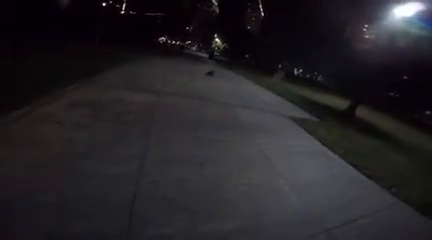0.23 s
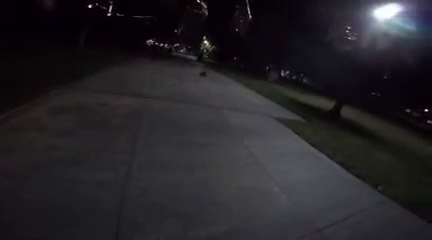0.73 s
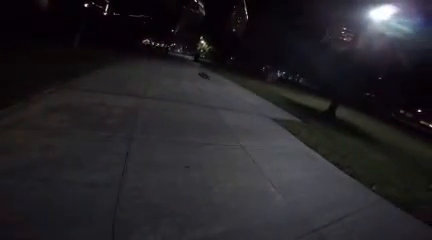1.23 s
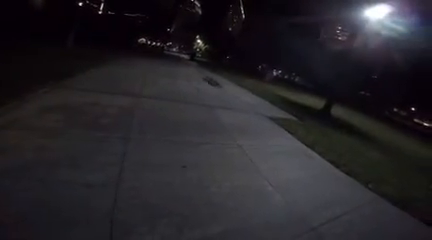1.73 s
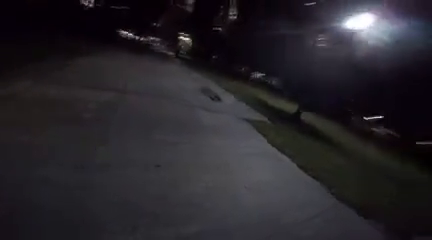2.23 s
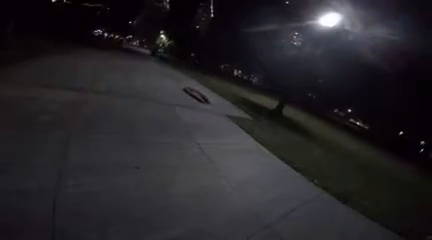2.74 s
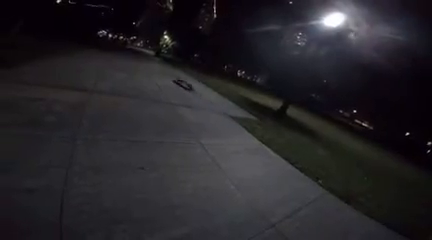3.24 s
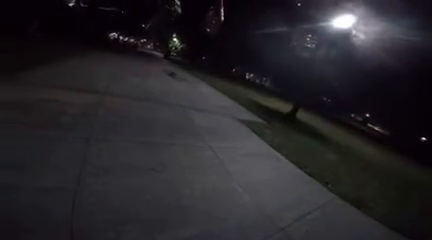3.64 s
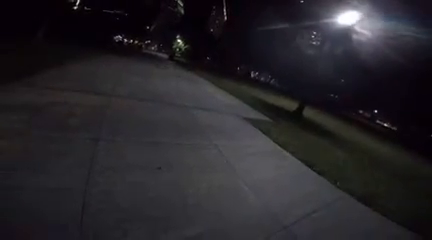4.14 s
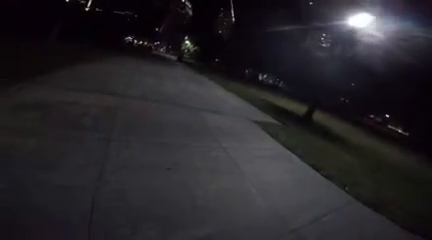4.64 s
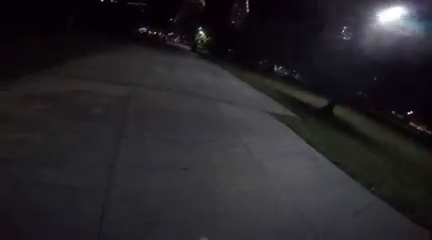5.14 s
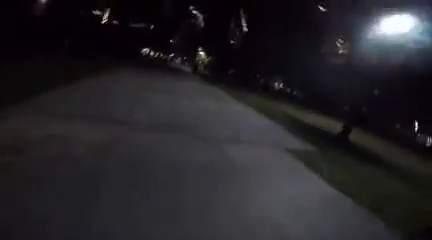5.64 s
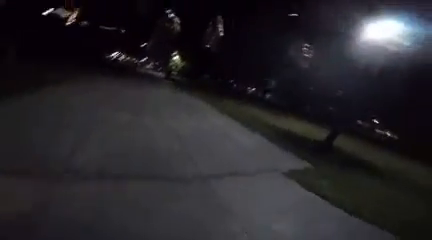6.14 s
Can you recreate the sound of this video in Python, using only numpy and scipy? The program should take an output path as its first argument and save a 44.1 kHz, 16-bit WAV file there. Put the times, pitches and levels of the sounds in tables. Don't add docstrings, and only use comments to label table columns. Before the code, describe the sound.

Brief high squeaks start a motorised board rolling outdoors. A steady buzzy whine joins gritty wheel noise, then hard knocks, ringing trucks, dull thuds and chattering loose parts crowd together around two and a half to three and a half seconds. The motor winds down, leaving wind puffs, isolated ticks and a faint distant coasting whine. Soft rolling and small rings build again at the end, over microphone hiss and a weak far engine drone.

```python
import sys
import numpy as np
from scipy import signal
from scipy.fft import rfft, irfft, next_fast_len
from scipy.io import wavfile

SR = 44100
rng = np.random.default_rng(int(sys.argv[2]) if len(sys.argv) > 2 else 0)


def bounce(signal):
    frames = np.transpose(np.atleast_2d(signal))
    limited = np.clip(frames, -1, 1)
    pcm = np.round(limited * 32767).astype(np.int16)
    wavfile.write(sys.argv[1], SR, pcm)


def decibels_to_gain(level_db):
    exponent = np.asarray(level_db, float) / 20
    return 10 ** exponent


N = 281797

# time in seconds, level in dB
DRONE = [
    (.04, -74),
    (.24, -58),
    (.62, -68.5),
    (.85, -75),
    (1.22, -65.5),
    (2.2, -62.5),
]
# time in seconds, level in dB
WHIRR = [
    (.3, -70),
    (1.3, -76),
    (3.3, -74),
]
# frequency in Hz, density in dB per Hz
HISS = [(200, 1), (300, -1), (800, -6), (1400, -7.5), (2600, -6.5), (2880, -3.5), (3500, -10),
        (4500, -10.5), (6000, -11), (7000, -13.5), (9000, -14.5), (11500, -18.5), (13000, -16.5),
        (16500, -16)]
# frequency in Hz, level in dB, delay in seconds, length in seconds
BURSTS = [
    (12490, -71, 0, .0028),
    (8555, -72, .0062, .004),
]
# time in seconds, gust level in dB
AIR = [(0, -72), (.6, -56), (2.0, -53.5), (2.4, -46), (2.6, -55.5), (3.5, -56), (4.1, -60), (4.9, -53),
       (5.7, -47), (6.1, -55), (6.39, -64)]
# time in seconds, level in dB
GUSTS = [(.03, -45.5), (.16, -48), (.28, -54), (.53, -48), (2.13, -60), (2.3, -44), (2.44, -48),
         (2.99, -52.5), (3.2, -56), (3.67, -50.5), (3.9, -49), (4.03, -51.5), (4.17, -49.5), (4.34, -51.5),
         (4.59, -55), (4.75, -57), (5.26, -74), (5.5, -56), (5.78, -48), (5.9, -45), (6.03, -47),
         (6.31, -42.5)]
# time in seconds, level in dB
EDDIES = [(0.0, -62.5), (0.21, -60.5), (0.64, -61.5), (2.03, -60.5), (2.21, -59.5), (2.65, -62.5),
          (3.75, -62.5), (3.9, -68.5), (4.04, -56.5), (4.09, -73.5), (4.18, -55.5), (4.22, -74),
          (4.36, -63.5), (4.43, -66), (5.91, -63), (6.26, -66), (6.32, -58.5), (6.39, -68)]
# frequency in Hz, density in dB per Hz
BUFFET = [(7.1, -12), (12, 6), (32, 2.5), (90, -20.5), (120, -63), (200, -120)]
# frequency in Hz, density in dB per Hz
FLUTTER = [(29, -34), (50, -6.5), (119, -14), (151, -16.5), (210, -22.5), (385, -33), (450, -55),
           (580, -83), (990, -120)]
# time in seconds, peak level in dB
PUFFS = [(2.199, -47), (2.29, -44), (2.33, -54), (3.714, -41), (3.965, -48), (4.011, -47), (4.037, -45.5),
         (4.133, -49), (4.168, -46.5), (5.1, -50), (5.284, -49)]
# start in seconds, peak level in dB, frequency in Hz
TICKS = [
    (4.3294, -58, 6000),
    (4.3794, -60, 5800),
    (4.7516, -62, 12100),
    (4.7765, -60, 11600),
    (5.139, -62, 4540),
    (6.095, -55, 4420),
]
# start in seconds, peak level in dB, frequency in Hz
THUDS = [
    (1.55, -45.5, 176),
    (1.585, -54, 122),
    (2.086, -59, 124),
    (2.278, -52.5, 317),
    (2.382, -65, 161),
    (2.969, -59.5, 128),
    (3.144, -50.5, 161),
    (3.331, -59, 121),
    (3.568, -54, 158.4),
]
# time in seconds, level in dB
BEARING = [
    (.25, -73),
    (4.63, -82),
    (5.8, -78),
    (5.96, -74),
    (6.22, -84),
    (6.37, -72),
]
# frequency in Hz, width in Hz, level in dB
BEARING_NOTE = [(2890, 280, -2), (2980, 266, -1.5)]
# start in seconds, peak level in dB, frequency in Hz
SQUEAKS = [(.0618, -54, 2740), (0.12, -41, 2840), (0.145, -47, 2890), (0.169, -38, 2830),
           (.2503, -51, 2780), (.2668, -49, 2830), (.3194, -53, 2790), (0.35, -47, 3000),
           (4.3964, -48.5, 2810), (4.4448, -44, 2855), (4.937, -52, 2670), (4.956, -51, 2720),
           (4.962, -51, 3300), (4.9744, -52, 2740), (5.6416, -48, 2840), (5.7767, -41.5, 2890)]
# time in seconds, whine in Hz, level in dB
COAST = [
    (4.44, 3010, -83),
    (4.54, 3500, -74),
    (4.7, 3560, -73),
    (4.86, 3640, -73),
    (4.93, 3500, -86),
]
# start in seconds, peak level in dB
CRACKS = [
    (2.208, -54),
    (2.261, -44),
    (2.3825, -58),
    (2.503, -52),
    (2.977, -47),
    (3.1457, -38.5),
    (3.207, -37.5),
    (3.3203, -46),
    (3.4755, -48.5),
    (3.5733, -49),
]
# start in seconds, peak level in dB, frequency in Hz
CHATTER = [(2.387, -59, 5200), (2.4073, -51, 5170), (2.4821, -58, 5410), (2.5016, -48, 5200),
           (2.5645, -54, 5350), (2.612, -46, 5240), (2.6587, -53, 5270), (2.7066, -56, 5170),
           (2.741, -52, 5250), (2.8154, -53.5, 5260), (2.8553, -56.5, 5370), (2.8992, -55.5, 5230),
           (2.9764, -40.5, 5370), (3.0523, -45, 5650), (3.068, -53, 5100), (3.1443, -37.5, 5570),
           (3.197, -53.5, 5450), (3.207, -54, 5300), (3.2454, -57, 5050), (3.2637, -51, 5670),
           (3.3038, -54, 5220), (3.3217, -51, 5040), (3.387, -55, 5400), (3.4021, -56, 4930),
           (3.4335, -48, 5100), (3.4725, -51, 5100), (3.5223, -53.5, 5120), (3.5727, -42, 5130),
           (3.5991, -54.5, 5400), (3.634, -54, 5270), (3.6854, -56, 5070), (3.7273, -47.5, 5260),
           (3.7667, -49, 5360), (3.8286, -55, 5150), (3.916, -57, 4850), (3.9628, -55.5, 4670)]
# start in seconds, peak level in dB, frequency in Hz
TRUCK_RINGS = [(1.4036, -58, 1850), (1.5100, -45, 1840), (1.5408, -45.5, 1670), (1.5707, -43, 1870),
               (1.6331, -43, 1880), (1.652, -49, 1700), (1.7496, -47, 1790), (1.781, -49.5, 1940),
               (1.8201, -45, 1930), (2.0094, -48, 1800), (2.079, -36, 1900), (2.1425, -43, 1950),
               (2.2045, -47, 1810), (2.2082, -38, 1650), (2.2845, -44, 1710), (2.3539, -47, 1930),
               (2.3848, -35, 1860), (2.4656, -50, 1910), (2.4851, -35.5, 1780), (2.5006, -35.5, 1840),
               (2.5305, -36, 1910), (2.561, -34, 1850), (2.5981, -35.5, 1764), (2.6393, -39, 1900),
               (2.6575, -41, 1890), (2.7424, -38.5, 1920), (2.8177, -38, 1730), (2.9017, -35, 1800),
               (2.9685, -32, 1780), (3.051, -35, 1760), (3.1127, -49.5, 1920), (3.1377, -47, 1720),
               (3.1459, -41, 1740), (3.189, -48, 1940), (3.2064, -37, 1754), (3.2652, -42, 1920),
               (3.3227, -43, 1740), (3.4195, -48.5, 1920), (3.4355, -46, 1820), (3.4765, -38, 1910),
               (3.5577, -48, 1850), (3.5772, -34, 1940), (3.634, -45, 1750), (3.7677, -51, 1780)]
# start in seconds, peak level in dB, frequency in Hz
HOUSING_RINGS = [(1.4041, -48, 3400), (1.5104, -45, 3500), (1.571, -49.5, 3170), (1.7802, -44.5, 2900),
                 (1.9768, -54, 3010), (2.0107, -46.5, 2980), (2.086, -41.5, 3000), (2.1444, -40, 2970),
                 (2.209, -41, 2860), (2.2735, -40.5, 2150), (2.2766, -34, 3900), (2.3864, -38.5, 3030),
                 (2.4848, -47, 3830), (2.4996, -33, 3100), (2.53, -43, 3330), (2.6057, -43, 3100),
                 (2.6423, -51, 3760), (2.6567, -42, 2980), (2.7036, -49, 3870), (2.7426, -36.5, 3000),
                 (2.8216, -35, 2980), (2.903, -52, 2770), (2.9775, -38, 3540), (2.9775, -42, 3360),
                 (3.0531, -44, 3110), (3.1387, -40, 3400), (3.1466, -46, 3300), (3.205, -45, 2700),
                 (3.3227, -39, 2890), (3.3897, -44.5, 3460), (3.4764, -41.5, 2930), (3.5723, -42, 3130),
                 (3.5782, -40, 2640), (3.5773, -34, 2930), (3.7692, -48, 3440)]
# start in seconds, peak level in dB, frequency in Hz
RETURN_RINGS = [(4.667, -51, 1970), (4.689, -41, 3300), (4.691, -50, 1990), (4.826, -54, 2850),
                (4.938, -46, 2720), (5.406, -48, 2900), (5.8095, -53, 1440), (5.8445, -49, 1940),
                (5.8935, -56, 1640), (5.907, -56, 1870), (5.9229, -58, 2130), (5.952, -50, 1720),
                (5.9773, -51, 1940), (5.9983, -52, 1930), (6.061, -57, 1880), (6.105, -48, 1850),
                (6.136, -49, 2070), (6.1672, -46, 1740), (6.1908, -50, 2040), (6.2307, -47, 1740),
                (6.2562, -53, 1920), (6.3, -60, 1810), (6.3579, -50, 1830)]
# start in seconds, peak level in dB, frequency in Hz
PINGS = [
    (5.139, -52, 5500),
    (6.096, -46, 5450),
]
# frequency in Hz, width in Hz, level in dB
DECK = [(543, 250, 9), (700, 207, 6.5), (970, 340, 1.5), (1323, 225, 0.5)]
# frequency in Hz, width in Hz, level in dB
TRUCKS = [(1700, 274, -3), (1988, 320, 2), (2123, 680, -9.5), (2470, 250, -11.5)]
# frequency in Hz, width in Hz, level in dB
HOUSING = [(2925, 620, 0.5), (3372, 280, -1.5), (3745, 680, -2.5)]
# frequency in Hz, width in Hz, level in dB
SMALL_PARTS = [(5170, 750, 5), (5860, 1450, -11.5), (7360, 740, 0), (8500, 180, -6), (9700, 2300, -14)]
# frequency in Hz, width in Hz, level in dB
EDGES = [(9800, 2500, 0.85), (13600, 4200, -0.78)]
# peak time in seconds, peak level in dB, place struck (0 trucks, 1 housing, 2 small parts),
# length in ms. First the board coming nearer
KNOCKS_NEARING = [(1.4058, -51, 0.53, 5), (1.4856, -55.5, 1.55, 5.7), (1.5127, -46.5, 0.26, 3.5),
                  (1.542, -48, .05, 4.7), (1.572, -44, 0.73, 3), (1.5926, -58, 0.44, 6),
                  (1.6346, -44.5, 0.25, 3.8), (1.6539, -53, .1, 2.8), (1.7812, -53, 0.59, 4.7),
                  (1.8222, -54.5, 0.58, 50), (1.905, -54, 0.57, 9.5), (1.979, -54, 1.14, 4.5),
                  (2.0127, -50, 0.63, 8.4), (2.0785, -43.5, .15, 4.1), (2.088, -46, 0.54, 7.2),
                  (2.146, -47.5, 0.49, 11), (2.2106, -44.5, 0.44, 11), (2.263, -32, 0.6, 2.4),
                  (2.279, -37, 0.7, 9), (2.293, -52.5, 0.5, 10), (2.3875, -36.5, 0.83, 2.9),
                  (2.409, -50.5, .7, 6.6)]
# peak time in seconds, peak level in dB, place struck, length in ms
KNOCKS_PASSING = [(2.4861, -42, 0.12, 3.3), (2.502, -37, 0.68, 2.2), (2.5308, -41, .4, 2.2),
                  (2.562, -41.5, 0.18, 2.9), (2.573, -54.5, 1.7, 4.7), (2.5996, -42.5, 0.48, 2.1),
                  (2.6078, -43, 1.3, 4.5), (2.659, -45, 0.46, 7.2), (2.6684, -51, .5, 20),
                  (2.705, -46.5, 1.1, 8), (2.743, -41, 0.65, 4.2), (2.822, -42.5, 0.46, 9.7),
                  (2.9031, -44, 0.42, 9.1), (2.97, -40.5, .02, 1.8), (2.979, -42, 1.2, 7.4),
                  (2.995, -52, 1.7, 8.1), (3.054, -41, 0.39, 8.3), (3.0703, -48.5, 1.43, 6.9),
                  (3.1403, -42.5, 0.53, 7.6), (3.1466, -42.5, 0.34, 8.9), (3.21, -42.5, 0.48, 5.8),
                  (3.266, -51.5, 0.6, 6.7), (3.3238, -43.5, 0.4, 4.4), (3.391, -52, 1.4, 11),
                  (3.437, -50.5, 0.58, 15), (3.479, -47, 0.92, 6.9), (3.573, -41.5, 0.62, 6),
                  (3.5782, -42, 0.28, 3), (3.6356, -45, 0.44, 2.8), (3.69, -53.5, 1.1, 12)]
# peak time in seconds, peak level in dB, place struck, length in ms
KNOCKS_FAR = [(3.7708, -52, 0.98, 10), (3.967, -54, 1.1, 12), (4.6694, -54, 0.62, 2.3),
              (4.6917, -58, 0.7, 5), (4.828, -57, .6, 8.7), (4.838, -55, 0.45, 3.4),
              (4.9396, -53, 0.69, 3.1), (5.141, -52.5, 1.4, 3.5), (5.2268, -58, 0.72, 12),
              (5.2858, -55, 0.86, 4.7), (5.343, -56, .15, 6.2), (5.3768, -57, .25, 2.9),
              (5.407, -49, 0.83, 2.2), (5.5334, -56.5, 0.63, 20), (5.8464, -55, .1, 4.6),
              (5.8534, -54, .3, 6.5), (5.871, -56, .65, 3.9), (5.9244, -55, 0.5, 3.5),
              (5.9542, -58, 0.45, 13), (5.9998, -53, .25, 6.8), (6.011, -58, 0.55, 3.7),
              (6.096, -55, 1.7, 2.4), (6.106, -58, .5, 5.5), (6.1377, -54, 0.2, 5), (6.17, -56, 0.22, 4),
              (6.2323, -54, .05, 6.2), (6.3593, -60, 0.59, 22)]
# time in seconds, wheels on grit in dB, drive spin in dB
ROLL = [(0, -8, -16), (.18, -6, -2), (.48, -11, 4), (1.1, -9.5, 5), (1.56, 1.5, 8.5), (2.05, 2, -1.5),
        (2.28, 1, 8.5), (2.61, 4.5, 4.5), (3.2, 0.5, 8.5), (4.06, -9, 2.5), (4.2, -10, -15),
        (4.47, -26, -5), (4.7, -6.5, -1), (5.12, -10.5, -11), (5.46, -5.5, -3), (5.66, -9, -9.5),
        (6.01, -1, 1.5), (6.39, 2.5, 1)]
# mean level in dB, share of the grit's dB, share of the spin's dB
ROLL_SHARES = [
    (-69.5, 1, 0.01),
    (-72.5, 0.45, 0.86),
    (-69.5, 0.0098, 0.84),
    (-71.5, 0.79, 0.44),
]
# time in seconds, small parts in dB
FACING = [
    (0, 4),
    (1.3, -0.5),
    (2.2, -1.5),
    (3.0, -0.5),
    (3.6, 1),
    (4.05, 3.5),
    (4.15, 1.5),
    (5.6, -1),
    (5.9, -4),
    (6.39, -2.5),
]
# time in seconds, whine in Hz, level in dB, brightness in dB (high when facing the microphone)
MOTOR = [(.2, 1250, -100, -6), (.3, 1560, -73, -2), (.39, 1930, -71, -2), (.47, 1950, -65, -3),
         (.7, 1945, -64, -2), (1.0, 1950, -66, -6), (1.35, 1960, -69, -3), (1.7, 1960, -70.5, 1),
         (2.22, 1960, -84, -16), (2.37, 2000, -64, -11), (2.6, 2020, -61, -15), (2.9, 2040, -61, -22),
         (3.3, 2000, -62.5, -24), (3.62, 1980, -63, -22), (3.83, 1950, -63.5, -27), (3.96, 1800, -68, -27),
         (4.16, 1600, -100, -20.5)]
ORDERS_OF_WHINE = (1, 2, 3, 7 / 4, 7 / 8, 3 / 2, 13 / 8, 15 / 8)
# dB over the level, share of the level's swing, share of the brightness,
# dB lost per 100 Hz below cruise
WHINE_LINES = [(0.5, 1.24, 0.11, 0), (4.5, 0.77, 0.18, -1.5), (0.5, 0.59, 0.56, 5), (-1.5, 0.55, 0.33, 1),
               (-14, 0.4, 0.7, -1.5), (-2.5, 0.4, 0.3, 2), (-9, .6, 0.3, 8), (-10.5, 0.42, 0.11, 5)]


def rms_one(x):
    return x / np.sqrt(np.mean(x ** 2) + 1e-20)


def in_time(rows):
    s, *columns = np.transpose(rows)
    return [np.interp(np.arange(N) / SR, s, c) for c in columns]


def swells(rows, rise_db_per_s, fall_db_per_s):
    t = np.arange(N) / SR
    return sum(decibels_to_gain(db - np.where(t < s, rise_db_per_s * (s - t), fall_db_per_s * (t - s))) for s, db in rows)


def drift(rate_hz):
    r = np.exp(-2 * np.pi * rate_hz / SR)
    noise = rng.standard_normal(N + SR)
    return rms_one(signal.lfilter([1], [1, -2 * r, r * r], noise)[SR:])


def resonate(x, peaks):
    out = 0
    for k, (hz, width, db) in enumerate(peaks):
        r = np.exp(-np.pi * width / SR)
        section = [(1 - r * r) / 2, 0, (r * r - 1) / 2, 1, -2 * r * np.cos(2 * np.pi * hz / SR), r * r]
        out = out + (-1) ** k * decibels_to_gain(db) * signal.sosfilt([section, section], x)
    return out


def coloured(spectrum):
    hz, db = np.transpose(spectrum)
    size = next_fast_len(N)
    bins = np.maximum(np.arange(size // 2 + 1) * SR / size, 1)
    shape = decibels_to_gain(np.interp(np.log(bins), np.log(hz), db, left=-60, right=-60))
    return rms_one(irfft(shape * rfft(rng.standard_normal(size)), size)[:N])


def background(hiss_db=-66.5, drone_hz=102.8, sag_hz_per_s=1.78):
    hz = drone_hz - sag_hz_per_s * np.arange(N) / SR
    drone = np.sqrt(2) * swells(DRONE, 58, 43) * np.sin(2 * np.pi * np.cumsum(hz) / SR)
    whirr = rms_one(resonate(rng.standard_normal(N), [(10920, 570, -0.32), (12860, 2100, -0.67)]))
    return drone + swells(WHIRR, 35, 19) * whirr + decibels_to_gain(hiss_db) * coloured(HISS)


def sensor(row_db=-71.3, half_db=-77.5, frame_hz=30 / 1.001, start_s=.0185, rows=421):
    frames = (np.arange(N) / SR - start_s) * frame_hz
    out = decibels_to_gain(row_db) * np.cos(2 * np.pi * rows * frames)
    out += decibels_to_gain(half_db) * np.sin(np.pi * rows * (frames % 1))
    for hz, db, delay, length in BURSTS:
        t = ((frames - delay * frame_hz + .5) % 1 - .5) / frame_hz
        out -= decibels_to_gain(db) * np.exp(-np.pi * (t / length) ** 2) * np.cos(2 * np.pi * hz * t)
    return out


def air(puff_s=0.0029, lump_db=2, flutter_db=-0.5, flutter_follows=0.036):
    gusts = swells(GUSTS, 185, 193)
    buffet_db = 20 * np.log10(decibels_to_gain(in_time(AIR)[0]) + gusts)
    eddy_db = flutter_db + flutter_follows * (buffet_db - buffet_db.mean()) + in_time(EDDIES)[0]
    out = decibels_to_gain(buffet_db) * coloured(BUFFET)
    out += decibels_to_gain(eddy_db + lump_db * drift(6.1)) * coloured(FLUTTER)
    t = np.arange(-round(0.0204 * SR), round(.02 * SR)) / SR / puff_s
    for s, peak_db in PUFFS:
        out[round((s - .016) * SR):][:len(t)] += decibels_to_gain(peak_db + 3.5) * t * np.exp(-t * t / 2)
    return out


def ticks(length_s=0.0026):
    t, out = np.arange(round(0.033 * SR)) / SR, np.zeros(N)
    for (s, peak_db, hz), shake in zip(TICKS, rng.standard_normal((len(TICKS), len(t)))):
        ring = resonate(shake * np.exp(-t / length_s), [(hz, 1800, 0)])
        out[round(s * SR):][:len(t)] += decibels_to_gain(peak_db) * ring / np.max(np.abs(ring))
    return out


def thuds(t60_s=0.088, rise_s=0.0027):
    t, out = np.arange(round(.1 * SR)) / SR, np.zeros(N)
    for s, peak_db, hz in THUDS:
        swell = decibels_to_gain(peak_db + 1.5 - 60 * t / t60_s) * (1 - np.exp(-t / rise_s))
        out[round(s * SR):][:len(t)] += swell * np.sin(2 * np.pi * hz * t)
    return out


def bearing(mean_db=-74, follows_grit=0.94, patchy_db=3.4):
    level = decibels_to_gain(mean_db + follows_grit * in_time(ROLL)[0]) + swells(BEARING, 72, 51)
    return level * decibels_to_gain(patchy_db * drift(24)) * rms_one(resonate(rng.standard_normal(N), BEARING_NOTE))


def squeaks(rise_s=0.0028, t60_s=0.059, glide=0.014):
    t, out = np.arange(round(.1 * SR)) / SR, np.zeros(N)
    for s, peak_db, hz in SQUEAKS:
        swell = (1 - np.exp(-t / rise_s)) * decibels_to_gain(peak_db - 5.0 - 60 * t / t60_s)
        out[round(s * SR):][:len(t)] += swell * np.sin(2 * np.pi * hz * t * (1 + glide * t / 0.039))
    return out


def coasting(blur_hz=130):
    hz, db = in_time(COAST)
    blur = drift(blur_hz) + 1j * drift(blur_hz)
    whine = np.real(blur * np.exp(2j * np.pi * np.cumsum(hz) / SR))
    return (db > -83.9) * decibels_to_gain(db) * whine


def cracks(length_s=0.0013, low_hz=900, high_hz=9000, over_db=-2.0):
    t, out = np.arange(round(0.013 * SR)) / SR, np.zeros(N)
    for (s, peak_db), shake in zip(CRACKS, rng.choice([-1., 1.], (len(CRACKS), len(t)))):
        out[round(s * SR):][:len(t)] += decibels_to_gain(peak_db + over_db) * shake * np.exp(-t / length_s)
    band = signal.butter(1, [low_hz, high_hz], "band", fs=SR, output="sos")
    return signal.sosfilt(band, out + 1e-18)


def chatter(length_s=0.003, width_hz=900, under_db=-3):
    t, out = np.arange(round(0.016 * SR)) / SR, np.zeros(N)
    for (s, peak_db, hz), shake in zip(CHATTER, rng.standard_normal((len(CHATTER), len(t)))):
        ring = resonate(shake * np.exp(-t / length_s), [(hz, width_hz, 0)])
        out[round(s * SR):][:len(t)] += decibels_to_gain(peak_db + under_db) * ring / np.max(np.abs(ring))
    return out


def rings(rise_s=0.00086, t60_s=0.021, under_db=-1.5, rough=0.33):
    t, out = np.arange(round(.05 * SR)) / SR, np.zeros(N + SR)
    rows = TRUCK_RINGS + HOUSING_RINGS + RETURN_RINGS + PINGS
    shape = (1 - np.exp(-t / rise_s)) * decibels_to_gain(-60 * t / t60_s)
    for (s, peak_db, hz), shake in zip(rows, rng.standard_normal((len(rows), len(t)))):
        tone = np.sin(2 * np.pi * hz * t) + rough * rms_one(resonate(shake, [(hz, 500, 0)]))
        out[round(s * SR):][:len(t)] += decibels_to_gain(peak_db + under_db) * shape * tone
    return out[:N]


def knocks(rise=0.5, fall=1.02, early_s=0.0008, tail_s=0.028, tail_db=-15, deck_db=-14, edge_db=-16,
           uneven_db=3.5, loss_db_per_part=8.5, small_parts_db=2.5, small_parts_fade=0.061):
    lead = round(.012 * SR)
    t = np.arange(-lead, 5 * lead) / SR
    hits = KNOCKS_NEARING + KNOCKS_PASSING + KNOCKS_FAR
    shakes = rng.choice([-1., 1.], (len(hits), len(t)))
    luck = uneven_db * rng.standard_normal((len(hits), 16))
    out = np.zeros(N + len(t))
    for (s, peak_db, place, ms), shake, luck_db in zip(hits, shakes, luck):
        away = np.abs(place - np.arange(3))
        part_db = peak_db - loss_db_per_part * (away - away[:2].min())
        trucks_db, housing_db, small_db = part_db
        small_db += small_parts_db + small_parts_fade * (peak_db + 44)
        length = max(ms - 1.8, .7) / 1000
        shape = np.exp(-((t + early_s) / length / np.where(t < -early_s, rise, fall)) ** 2)
        shape += (t > 0) * decibels_to_gain(tail_db) * min(ms / 5.0, 1) * np.exp(-t / tail_s)
        for part, db in [(TRUCKS, trucks_db), (HOUSING, housing_db), (SMALL_PARTS, small_db),
                         (DECK, trucks_db + deck_db), (EDGES, small_db + edge_db)]:
            struck = [(hz, width, level + luck_db[k + 2 * len(part)])
                      for k, (hz, width, level) in enumerate(part)]
            ring = resonate(shape * shake, struck)
            out[round(s * SR) - lead:][:len(t)] += decibels_to_gain(db - 0.5) * ring / np.max(np.abs(ring))
    return out[:N]


def rolling(grains_per_s=4000, spread_db=3, clump_db=1.5, trucks_turn_share=-0.83):
    clumps, out = decibels_to_gain(clump_db * drift(25.0)), 0
    grit_db, spin_db = in_time(ROLL)
    levels = [db + a * grit_db + b * spin_db for db, a, b in ROLL_SHARES]
    facing_db, = in_time(FACING)
    levels[1] = levels[1] + trucks_turn_share * facing_db
    levels[3] = levels[3] + facing_db
    for part, db, looseness in zip((DECK, TRUCKS, HOUSING, SMALL_PARTS), levels, (2.6, 1.2, 0.85, 1.8)):
        sizes = decibels_to_gain(spread_db * np.minimum(rng.exponential(1, N), 3)) * rng.choice([-1, 1], N)
        grit = sizes * (rng.random(N) < grains_per_s / SR) * clumps ** looseness
        out = out + decibels_to_gain(db + 0.5) * rms_one(resonate(grit, part))
    return out


def motor_phase(hz, grit_db, sag_share=.06, recover_s=0.033, onset_s=0.00665,
                wobble_share=0.01207, wobble_hz=25.4):
    load = np.zeros(N)
    for s, db, *_ in KNOCKS_NEARING + KNOCKS_PASSING:
        load[round(s * SR)] = sag_share * decibels_to_gain(db + 39.5)
    wobble = wobble_share * decibels_to_gain(0.6 * grit_db) * drift(wobble_hz)
    slow, fast = np.exp(-1 / (SR * np.array([recover_s, onset_s])))
    lasting = signal.lfilter([1], [1, -slow], load)
    sag = signal.lfilter([1 - fast], [1, -fast], lasting)
    return 2 * np.pi * np.cumsum(hz * (1 - sag + wobble)) / SR


def motor(core_hz=32, skirt_hz=90, skirt_db=-6.5, steady=.85, mean_db=-68, cruise_hz=1880):
    hz, level_db, bright_db = in_time(MOTOR)
    grit_db = in_time(ROLL)[0]
    phase, out = motor_phase(hz, grit_db), 0
    slack = np.maximum(cruise_hz - hz, 0) / 100
    for k, (over_db, follows, shines, slack_db) in zip(ORDERS_OF_WHINE, WHINE_LINES):
        core = drift(core_hz * k) + 1j * drift(core_hz * k)
        skirt = drift(skirt_hz * k) + 1j * drift(skirt_hz * k)
        shaken_db = (k > 1) * 0.7 * (grit_db + 10)
        blur = (steady / k + .5 * core) * decibels_to_gain(-.5 * shaken_db)
        blur = blur + .5 * decibels_to_gain(skirt_db + .5 * shaken_db) * skirt
        db = mean_db + over_db + follows * (level_db - mean_db) + shines * bright_db - slack_db * slack
        out = out + (level_db > -99) * decibels_to_gain(db) * np.real(blur * np.exp(1j * k * phase))
    return out


def scene():
    board = motor() + rolling() + knocks() + rings() + chatter() + cracks()
    board += squeaks() + thuds() + ticks() + bearing() + coasting()
    lag = round(.009 * SR)
    board[lag:] += decibels_to_gain(-17.0) * board[:-lag]
    return (board + air() + background())[None]


def roll_off(x):
    return signal.sosfilt(signal.butter(12, 15310, fs=SR, output="sos"), x)


def record(dry):
    low_pass = signal.cheby2(12, 60, 15900, fs=SR, output="sos")
    mix = signal.sosfilt(low_pass, dry + sensor())
    return roll_off(mix)


dry = scene()
out = record(dry)
bounce(out)
```